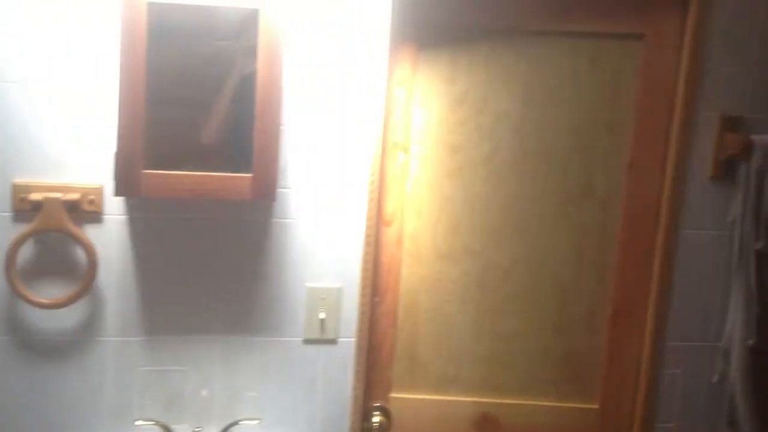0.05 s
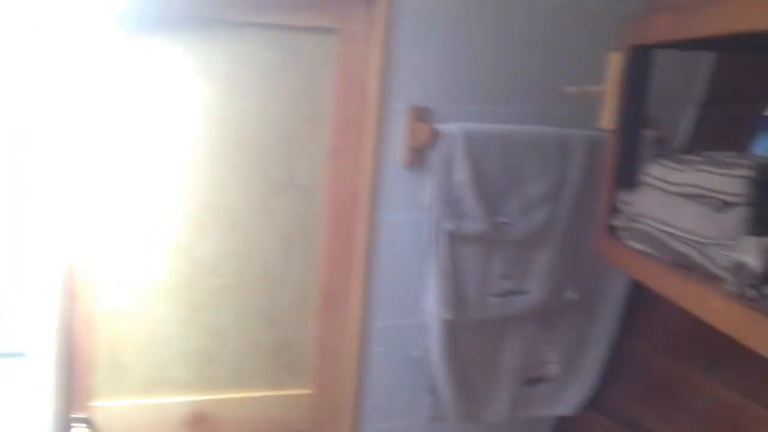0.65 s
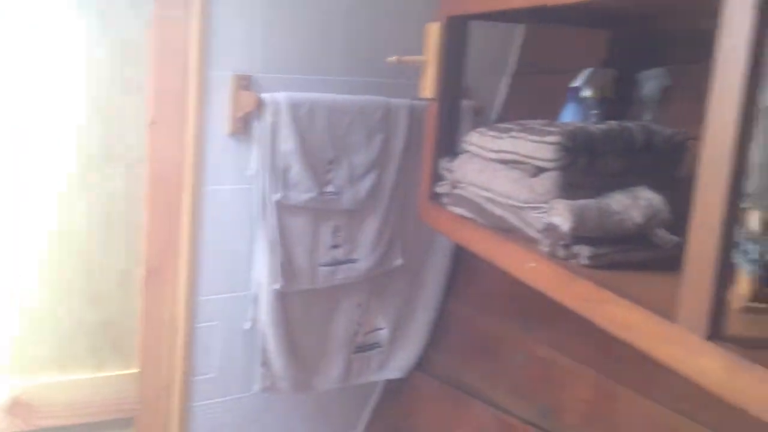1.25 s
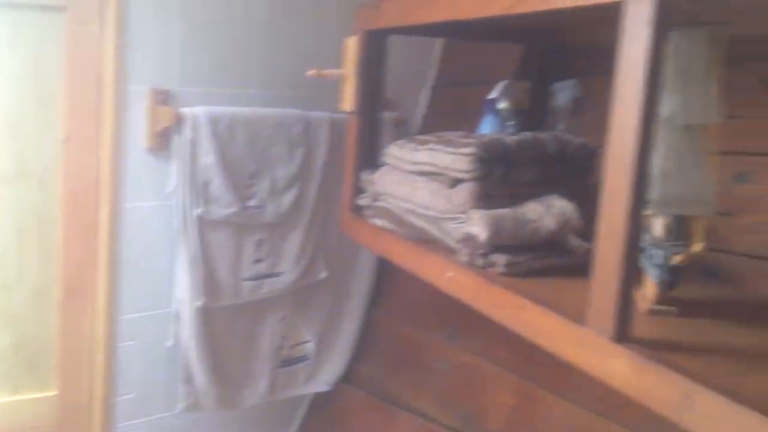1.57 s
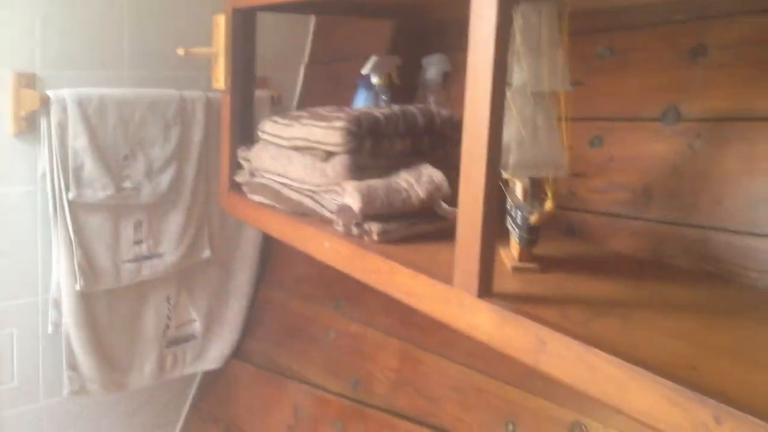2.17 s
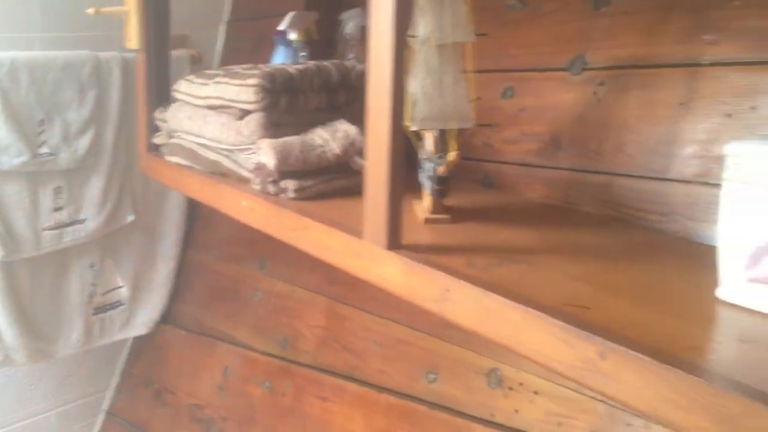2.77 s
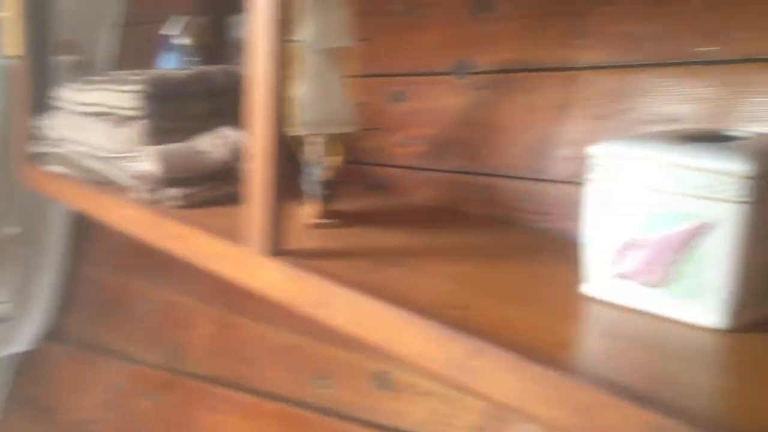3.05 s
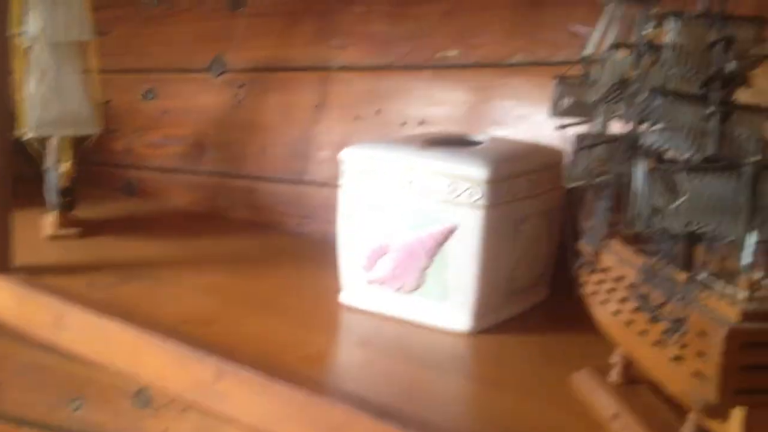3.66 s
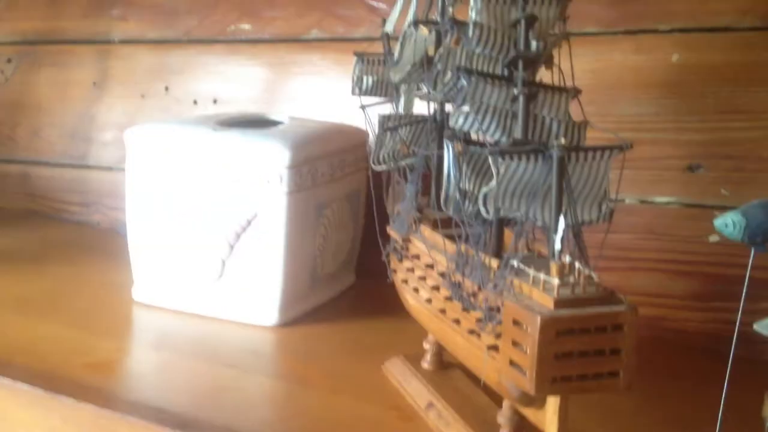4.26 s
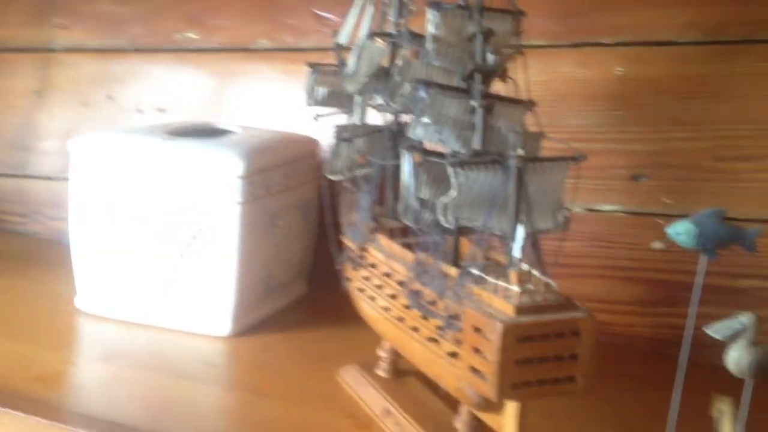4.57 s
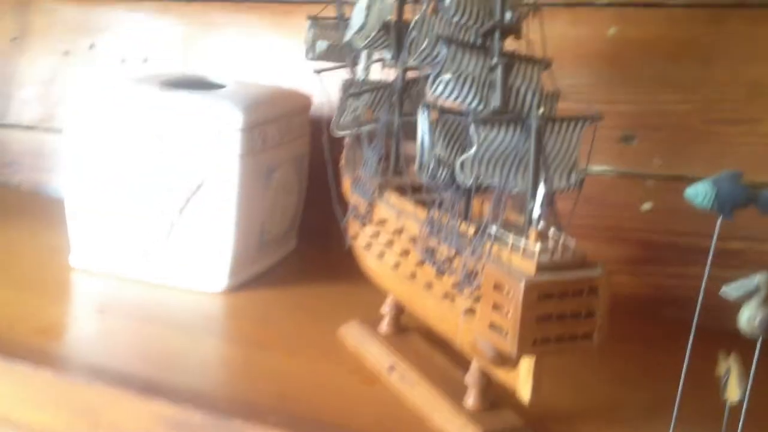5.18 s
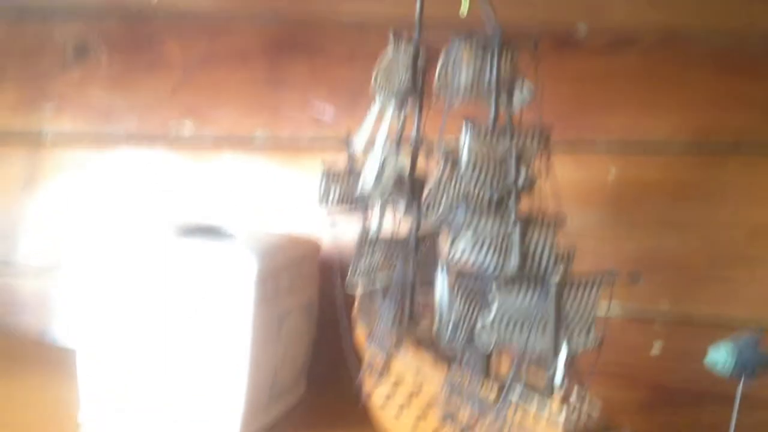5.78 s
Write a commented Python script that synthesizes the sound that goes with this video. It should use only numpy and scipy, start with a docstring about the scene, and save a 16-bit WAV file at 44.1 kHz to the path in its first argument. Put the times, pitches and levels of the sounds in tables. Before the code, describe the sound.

A wooden floor creaks in several crackling bursts in a small panelled room, with soft foot rubs and dull bumps between.

```python
"""A wooden floor creaks in a small panelled room as someone turns slowly on it, camera in hand.
A board joint sticks and slips: single ticks that run together into a creak as the weight shifts.
Each slip rings the board and the room. Between creaks the feet rub and the hand bumps the camera softly.
Heard in mono from where the person stands, on a small microphone, over still room tone and hiss."""
import sys
import numpy as np
from scipy import signal
from scipy.fft import rfft, irfft, next_fast_len
from scipy.io import wavfile

SR = 44100
rng = np.random.default_rng(int(sys.argv[2]) if len(sys.argv) > 2 else 0)


def file_out(sig):
    """Save sig as 16-bit WAV at sys.argv[1]."""
    # one column per channel
    cols = np.atleast_2d(sig).T
    # limit, then scale
    lim = np.clip(cols, -1, 1)
    pcm = np.round(lim * 32767).astype(np.int16)
    wavfile.write(sys.argv[1], SR, pcm)


N = 265482
TIME = np.arange(N) / SR
AGE = np.arange(int(.6 * SR)) / SR  # seconds since a slip or thud, for as long as it may ring


def creak(crack_db=39, wood_db=-3, edge_db=-2, ring_db=27, squeal_db=-3, rasp_db=-1):
    """Slips crack, ring the board and, under load, excite a rasp and a higher squeal in the joint."""
    # Colour of a slip's crack. Each row: frequency in Hz, gain in dB.
    crack_colour = [(60, -36.5), (150, -3), (200, 6), (290, 5), (345, -2.5), (410, 9.5), (560, 8.5),
                    (780, -1), (1050, -1), (1300, -2.5), (1750, 4.5), (2300, 0.5), (3100, -7), (4250, -2),
                    (4900, -1.5), (6200, -0.5), (7300, -7.5), (8400, -18), (10000, -35), (13000, -30.5)]
    # How strongly the joint squeals under the weight. Each row: time in seconds, relative level in dB.
    squeal_curve = [(1.9, -14), (2.4, -18), (3, -11), (4.2, -1), (4.8, -6), (5.2, 0.5), (5.45, 1.5),
                    (5.8, -8)]
    slip_rows = slips()
    lows, mids, highs = cracks(slip_rows)
    wood = undb(wood_db) * cut(lows, 1650, "low")
    edge = cut(highs, 2900, "high")
    crack = wood + cut(mids, [1100, 3400], "band") + undb(edge_db) * edge
    squeal = undb(squeal_db) * resonance(edge, hz=4150, width_hz=530)
    rasp = undb(rasp_db) * resonance(highs, hz=2540, width_hz=550)
    crack += (squeal + rasp) * undb(np.interp(TIME, *np.transpose(squeal_curve)))
    times, db, body_db, _ = slip_rows.T
    ring = signal.fftconvolve(clicks(times, undb(db + body_db)), board())[:N]
    return undb(crack_db) * colour(crack, crack_colour) + undb(ring_db) * ring


def slips(scatter_db=1, breakaway_db=1.5, ring_db=2.5, easy_per_s=19.2, choke_db_per_octave=2):
    """The joint slips each time it has crept a full step; returns these and the lone ticks as like rows."""
    # Lone slips. Each row: time in seconds, relative level in dB, ring and bright-edge offsets in dB.
    ticks = [(.618, -44.5, -3.5, -2), (.665, -43.5, -3.5, -0.5), (1.318, -60.5, 8, 9),
             (1.353, -44, 1.5, -3), (1.89, -43.5, 4.5, 4), (5.78, -40, -0.5, 0)]
    # Creep of the joint, one curve per shift of weight. Each point: time in seconds, slips per second.
    creep_curves = [
        [(.002, 100), (.058, 92)],
        [(2.009, 10.3), (2.097, 12.1), (2.185, 24.9), (2.258, 13.5), (2.619, 27.1), (2.678, 15.6),
         (2.722, 31.6), (2.744, 19.3), (2.844, 20.4)],
        [(3.004, 12.8), (3.079, 31.7), (3.104, 22.1), (3.237, 55.3), (3.321, 16.8), (3.43, 31.5), (3.432, 81.7),
         (3.52, 85.4)],
        [(4.063, 118), (4.149, 36.7), (4.185, 49.2), (4.289, 50.5), (4.37, 19.6)],
        [(4.746, 28.6), (4.95, 10.4), (5.005, 35.1), (5.09, 22.5), (5.161, 46.1), (5.244, 20.6), (5.38, 56.9),
         (5.53, 15.3), (5.572, 9.2)],
    ]
    # Grip of the joint. Each row: time in seconds, relative slip level in dB, bright-edge offset in dB.
    grip = [(.03, -43.5, -1), (2, -44, -0.5), (2.3, -42.5, 0), (2.8, -43.5, -1), (3.05, -43, -1.5),
            (3.4, -43, -1), (3.51, -43, -5.5), (4.06, -45.5, -1), (4.14, -41, -0.5), (4.27, -41.5, 1.2),
            (4.35, -41, 0.5), (4.75, -41, 1.5), (5.05, -40.5, -1), (5.2, -41.5, 4), (5.38, -42, 2),
            (5.55, -43.5, 4)]
    grip_s, grip_db, grip_bright_db = np.transpose(grip)
    rows = [np.array(ticks, float)]
    for curve in creep_curves:
        knots, rates = np.transpose(curve)
        span = TIME[(TIME >= knots[0]) & (TIME <= knots[-1])]
        creep = np.cumsum(np.interp(span, knots, rates)) / SR
        times = np.interp(np.arange(np.ceil(creep[-1])), creep, span)
        db = np.interp(times, grip_s, grip_db) + scatter_db * rng.standard_normal(len(times))
        db[0] += breakaway_db  # the first slip after a long stick is stronger
        octaves = np.log2(np.maximum(np.interp(times, knots, rates) / easy_per_s, 1))
        body_db = ring_db - choke_db_per_octave * octaves  # faster slips rock the board less
        rows.append(np.column_stack([times, db, body_db, np.interp(times, grip_s, grip_bright_db)]))
    slip_rows = np.vstack(rows)
    slip_rows[:, 0] += rng.uniform(-.0005, .0005, len(slip_rows))
    return slip_rows[np.argsort(slip_rows[:, 0])]


def cracks(slip_rows, memory_s=.92, fresh_db=-8, snap=.21, edge_snap=.16):
    """Each slip reaches the microphone through the room, with a decay each for lows, mids and highs."""
    decays = np.array([room_decay(swell_s=.007, early_t60=.11, late_t60=.34, late_db=-3),
                       room_decay(swell_s=.00044, early_t60=.024, late_t60=.34, late_db=-1.5),
                       room_decay(swell_s=.0021, early_t60=.27, late_t60=.54, late_db=-13.5)])
    out = np.zeros((3, N + len(AGE)))
    pattern, last_s = reflections(), 0
    for s, db, body_db, bright_db in slip_rows:
        # the microphone moves, so the echo pattern slowly changes
        kept = np.exp(-abs(s - last_s) / memory_s)
        pattern = kept * pattern + np.sqrt(1 - kept ** 2) * reflections()
        last_s = s
        fresh = undb(fresh_db) * reflections()  # each slip breaks a little differently
        tick = decays * (pattern + fresh) / np.hypot(1, undb(fresh_db))
        tick[:, 0] += (0, snap, edge_snap)  # the direct sound
        start = max(int(s * SR), 0)
        out[:, start:start + len(AGE)] += tick * undb(db + np.array([[body_db], [0], [bright_db]]))
    return out[:, :N]


def board(swell_cycles=.98):
    """The floorboard's modes: each takes about a cycle to build up, then rings out."""
    # Each row: frequency in Hz, relative level in dB, t60 in seconds. The last three: the joint's dry snap.
    modes = [(184, -5, .3), (211, -1, .3), (262, -7, .25), (290, -3, .25), (386, -1, .4), (462, -4, .25),
             (481, 1, .45), (555, -7, .2), (579, 1, .42), (677, -6, .35), (1008, -6, .45), (1430, -9, .3),
             (1545, -5, .15), (1745, -4, .2), (1839, -6, .22), (2099, -8, .3), (2306, -9, .25),
             (4107, -9, .3), (4297, -8, .35), (1620, -2, .016), (1900, -4, .012), (2400, -3, .012)]
    ring = np.zeros(len(AGE))
    for hz, db, t60 in modes:
        tone = np.sin(2 * np.pi * (hz * AGE + rng.random()))
        swell = 1 - np.exp(-hz * AGE / swell_cycles)
        ring += undb(db) * unit(tone * fade(t60) * swell)
    return unit(ring)


def rubbing(grain_db=3, count=1250):
    """A sole drags on the boards: many soft, uneven slips make a low groan, with a light scuff above it."""
    # One curve per rub of a foot. Each point: time in seconds, groan level in dB, scuff level in dB.
    rubs = [
        [(0, -42, -34.5), (.11, -59.5, -54.5), (.21, -44.5, -52), (.28, -49, -56), (.38, -54.5, -59),
         (.46, -72, -64), (.6, -89, -63), (.75, -75, -67), (.9, -102, -115)],
        [(3.58, -73, -70), (3.64, -53, -63), (3.755, -44.5, -64.5), (3.79, -54, -81), (3.9, -84, -99)],
        [(5.6, -69, -72), (5.7, -81, -66.5), (5.9, -84.5, -64.5), (6.02, -79, -64)],
    ]
    # Spectra of the groan and the scuff. Each row: frequency in Hz, relative level in dB.
    groan_colour = [(60, -42), (110, -25), (160, -6), (205, 0), (260, -3), (330, -9), (410, -10),
                    (520, -20), (750, -31), (1500, -45), (9000, -85)]
    scuff_colour = [(200, -11), (300, 2.5), (420, 14.5), (560, 9.5), (800, 4), (1400, 0), (2500, 3),
                    (4200, 1.5), (5900, 1.5), (7200, -10.5), (9500, -31)]
    groan_gain, scuff_gain = np.zeros((2, N))
    for rub in rubs:
        knots, groan_db, scuff_db = np.transpose(rub)
        groan_gain += undb(np.interp(TIME, knots, groan_db, left=-200, right=-200))
        scuff_gain += undb(np.interp(TIME, knots, scuff_db, left=-200, right=-200))
    starts = (np.arange(count) + 2 * rng.random(count)) * TIME[-1] / count
    grains = clicks(starts, undb(grain_db * rng.standard_normal(count)))
    groan = unit(colour(grains - grains.mean(), groan_colour)) * np.sqrt(N)
    return groan_gain * groan + scuff_gain * noise(scuff_colour)


def bumps(push_s=.0045, rumble_db=-9, rumble_t60=.54):
    """Soft knocks of feet on the floor and hand on the camera: a few dull cycles and a short rumble each."""
    # The heavier thuds. Each row: start in seconds, peak level in dB, pitch in Hz.
    heavy_thuds = [(.147, -49, 330), (0.199, -45.5, 207), (1.454, -52.5, 137), (1.496, -57, 126),
                   (1.596, -54, 137), (1.73, -57, 119), (1.973, -50.5, 166), (2.074, -51, 132),
                   (2.16, -54, 105), (3.693, -47, 208), (3.738, -55, 221), (4.472, -54, 141),
                   (4.53, -55, 148), (4.615, -53.5, 140), (5.79, -61, 95)]
    push = AGE / push_s * np.exp(1 - AGE / push_s)
    out = np.zeros(N + len(AGE))
    for s, db, hz in heavy_thuds + patter():
        thud = np.sin(2 * np.pi * hz * AGE) * push
        rumble = cut(rng.standard_normal(len(AGE)), [hz * .65, hz * 1.6], "band")
        rumble *= undb(rumble_db) / rumble.std() * fade(rumble_t60)
        start = int(s * SR)
        out[start:start + len(AGE)] += undb(db) * (thud + rumble)
    return out[:N]


def patter(gap_s=.06, scatter_db=3, scatter_octaves=.09):
    """Shuffling feet land light thuds at uneven moments; returns the start, level and pitch of each."""
    # Spells of shuffling. Each row: start and end in seconds, typical peak in dB, typical pitch in Hz.
    shuffles = [(1.13, 1.4, -62, 133), (1.62, 1.9, -59, 119), (2.05, 2.5, -57, 116),
                (4.42, 4.71, -59.5, 125), (5.15, 5.45, -58.5, 115)]
    rows = []
    for start, end, db, hz in shuffles:
        for s in np.arange(start, end, gap_s):
            louder, higher = rng.standard_normal(2)
            late_s = gap_s * rng.random() / 2
            rows.append((s + late_s, db + scatter_db * louder, hz * 2 ** (scatter_octaves * higher)))
    return rows


def room_decay(swell_s, early_t60, late_t60, late_db):
    """Echoes off the panelling build up, fall quickly, then linger; energy one."""
    swell = 1 - np.exp(-AGE / swell_s)
    return unit(swell * np.hypot(fade(early_t60), undb(late_db) * fade(late_t60)))


def reflections(uneven_db=3):
    """A dense train of echoes of uneven strength; rms one."""
    echoes = rng.standard_normal(len(AGE)) * undb(uneven_db * rng.standard_normal(len(AGE)))
    return unit(echoes) * np.sqrt(len(AGE))


def room_tone(level_db=-68.5):
    """The still room and the microphone's own hiss."""
    # Spectrum of the background. Each row: frequency in Hz, relative level in dB.
    tone_colour = [(30, -35), (70, -6), (140, -1), (280, 7), (500, -0.5), (1000, -2.5), (2500, -7),
                   (5200, -3.5), (7500, -10.5), (9800, -20.5), (12500, -11), (15500, -11.5)]
    return undb(level_db) * noise(tone_colour)


def undb(db):
    """Decibels to gain."""
    return 10 ** (np.asarray(db) / 20)


def fade(t60):
    """Exponential decay that falls 60 dB in t60 seconds."""
    return np.exp(-np.log(1000) * AGE / t60)


def unit(x):
    """Scale to an energy of one."""
    return x / np.sqrt(np.sum(x ** 2))


def colour(x, points):
    """Causal filter with the given (Hz, dB) shape."""
    size = 2 * next_fast_len(len(x))
    hz, db = np.transpose(points)
    bin_hz = np.arange(size // 2 + 1) * SR / size
    gain = undb(np.interp(np.log(bin_hz + 1), np.log(hz), db))
    cepstrum = irfft(np.log(gain))
    cepstrum[1:size // 2] *= 2  # fold onto positive time for minimum phase
    cepstrum[size // 2 + 1:] = 0
    return irfft(rfft(x, size) * np.exp(rfft(cepstrum)))[:len(x)]


def noise(points):
    """Coloured noise of rms one."""
    return unit(colour(rng.standard_normal(N), points)) * np.sqrt(N)


def cut(x, hz, kind):
    """Butterworth low-, high- or band-pass."""
    return signal.sosfilt(signal.butter(4, hz, kind, fs=SR, output="sos"), x)


def resonance(x, hz, width_hz):
    """One resonance with a gain of one at its centre."""
    return signal.lfilter(*signal.iirpeak(hz, hz / width_hz, fs=SR), x)


def clicks(times, sizes):
    """One impulse at each time."""
    return np.bincount(np.clip(times * SR, 0, N - 1).astype(int), sizes, N)


def scene():
    """The creaking floor, feet and hand over the still room, in mono."""
    return (creak() + rubbing() + bumps() + room_tone())[None]


def record(dry, bass_hz=60, top_hz=15400):
    """The small microphone loses the deep bass; the top is cut steeply."""
    thin = signal.sosfilt(signal.butter(2, bass_hz, "high", fs=SR, output="sos"), dry)
    return signal.sosfilt(signal.ellip(10, .2, 70, top_hz, fs=SR, output="sos"), thin)


dry = scene()
out = record(dry)
file_out(out)
```